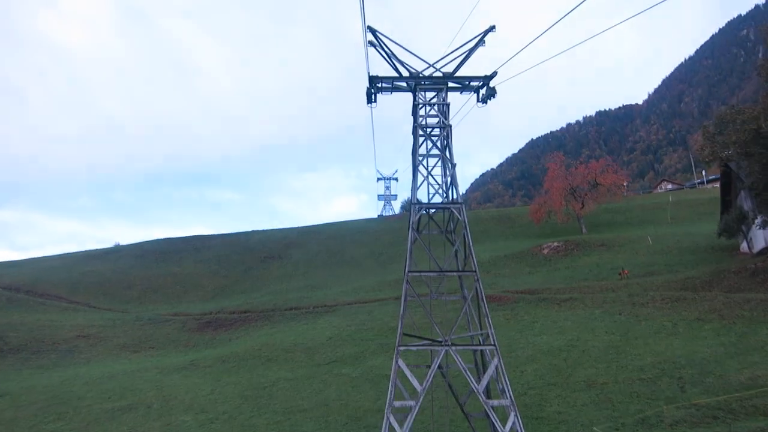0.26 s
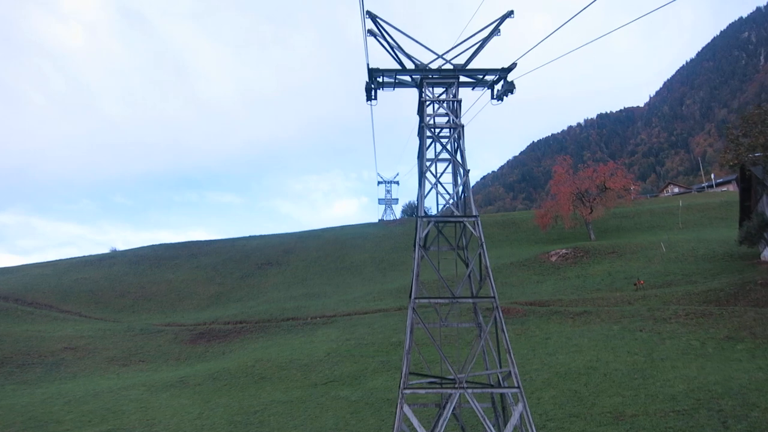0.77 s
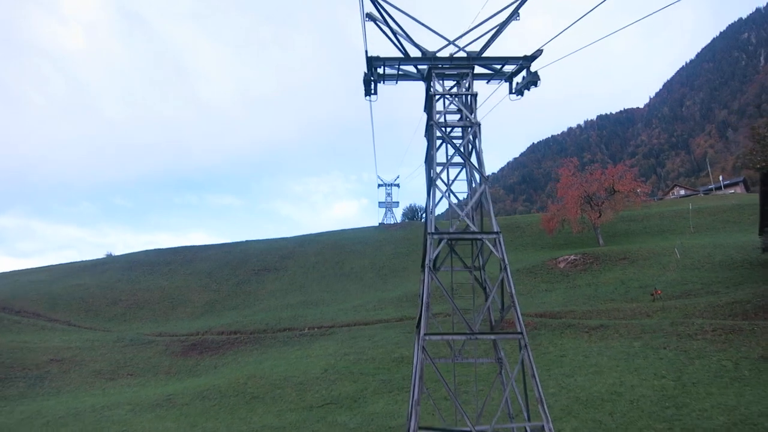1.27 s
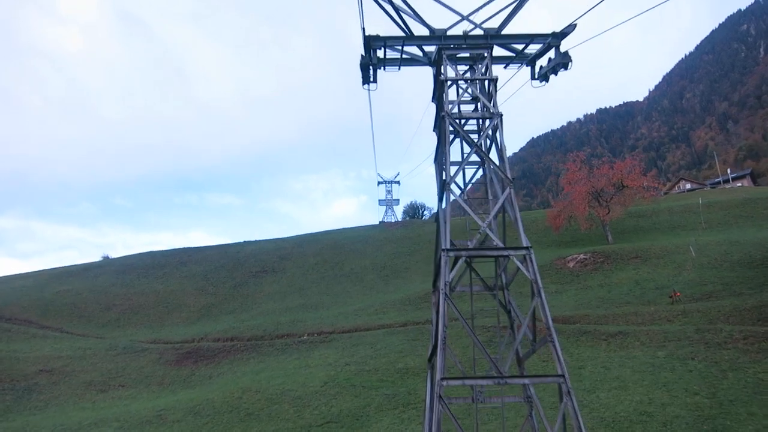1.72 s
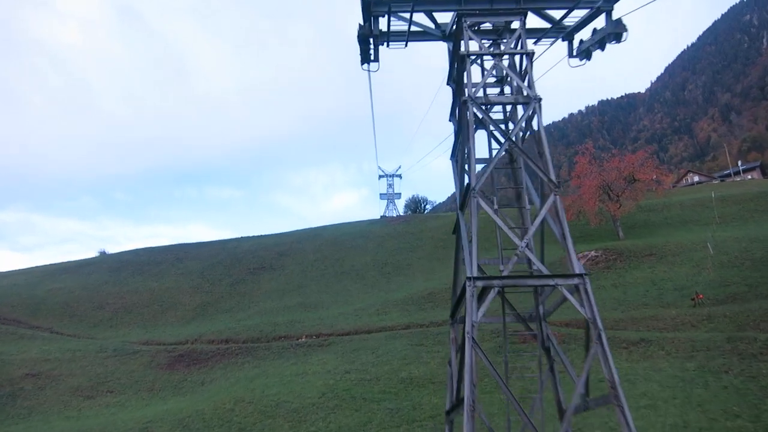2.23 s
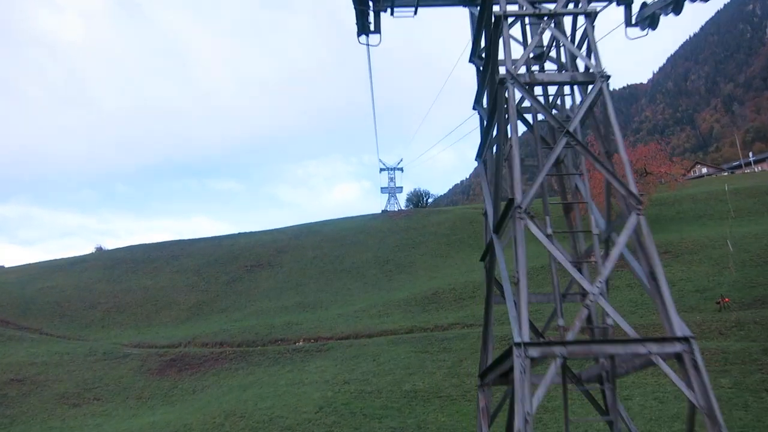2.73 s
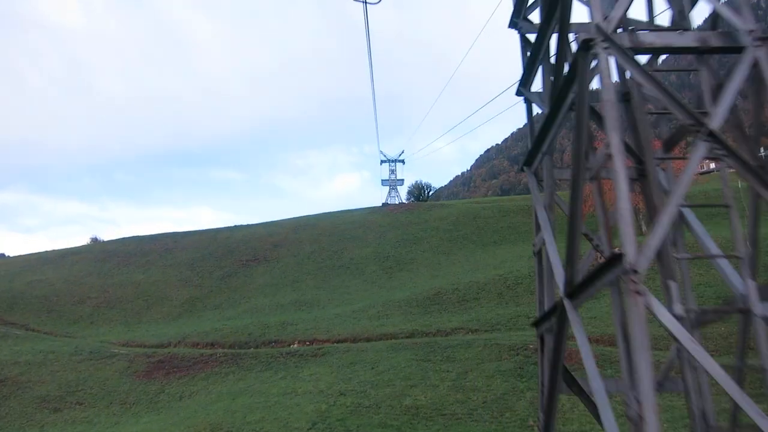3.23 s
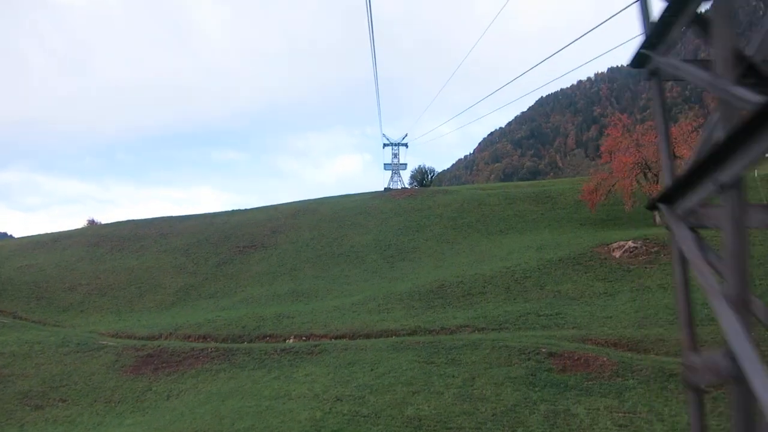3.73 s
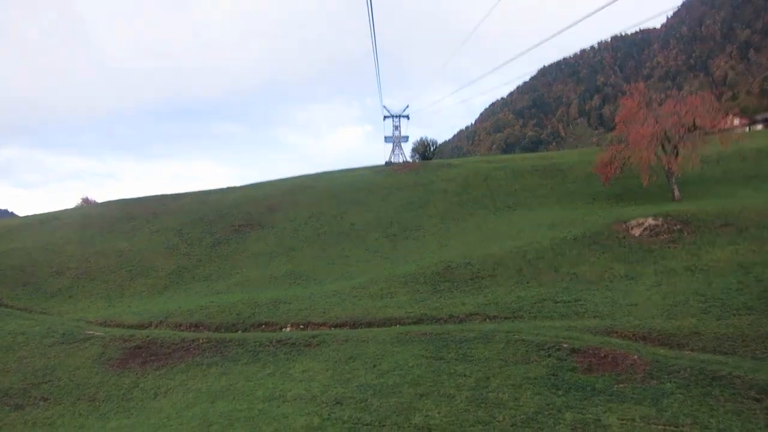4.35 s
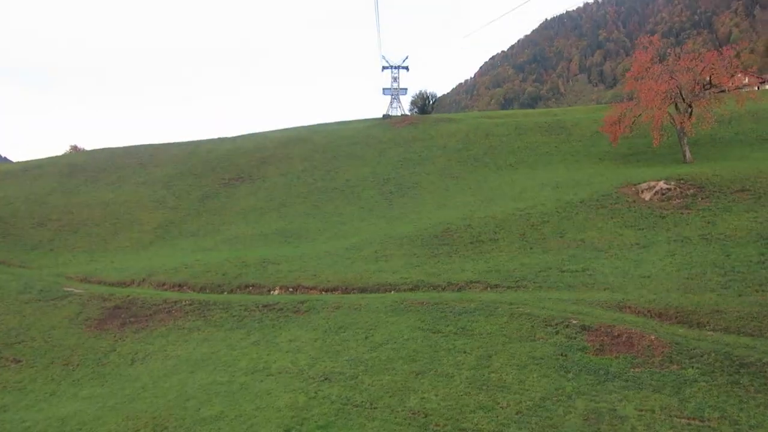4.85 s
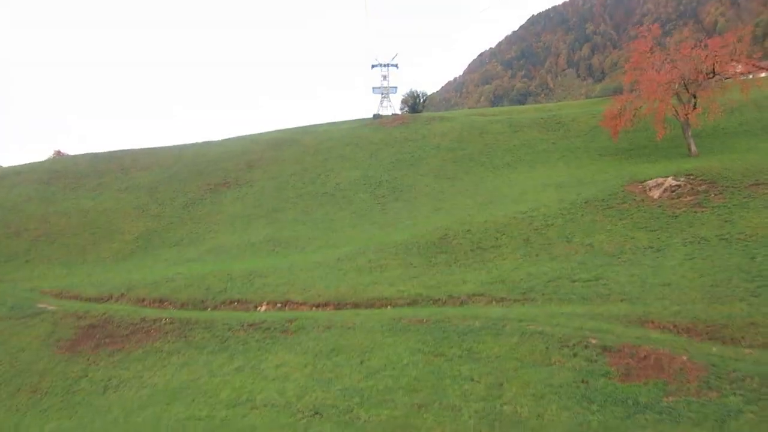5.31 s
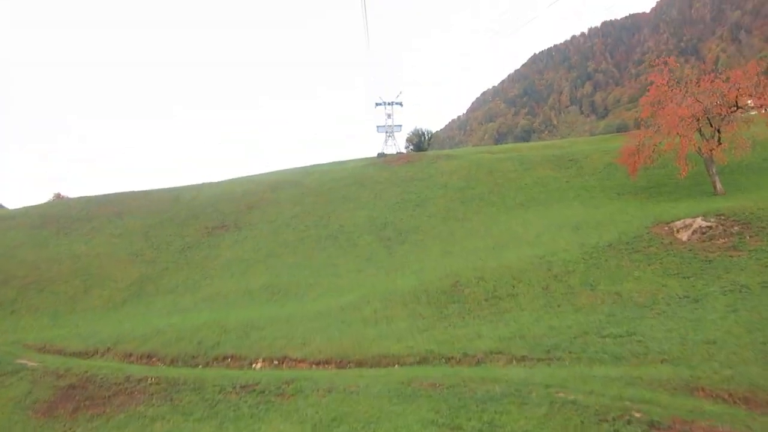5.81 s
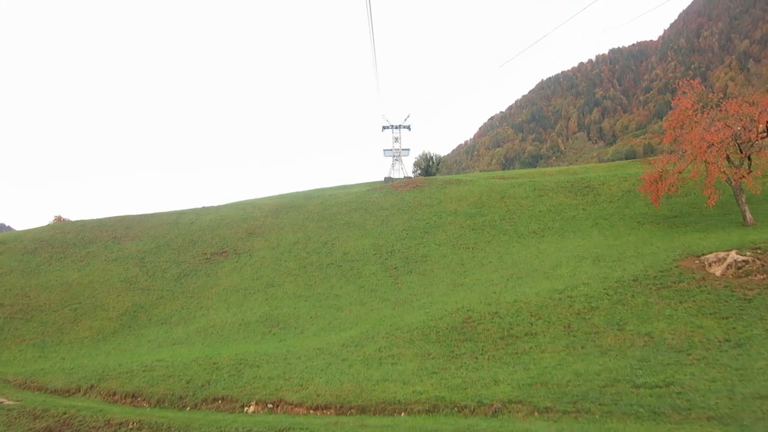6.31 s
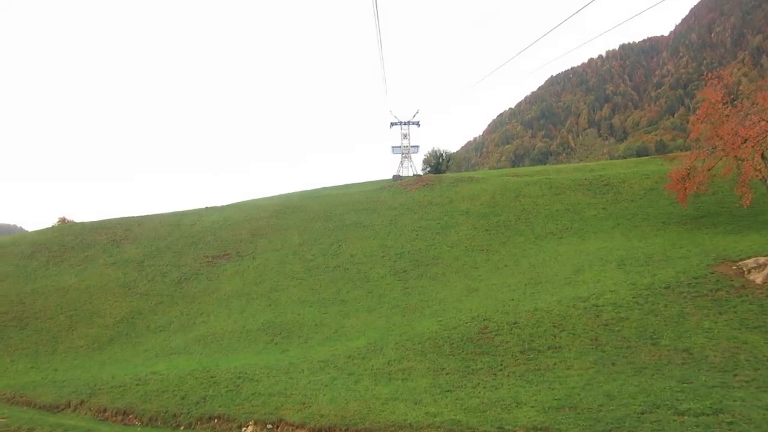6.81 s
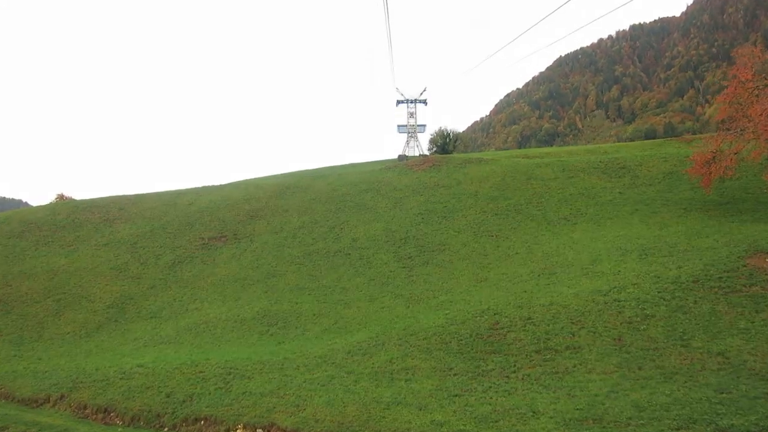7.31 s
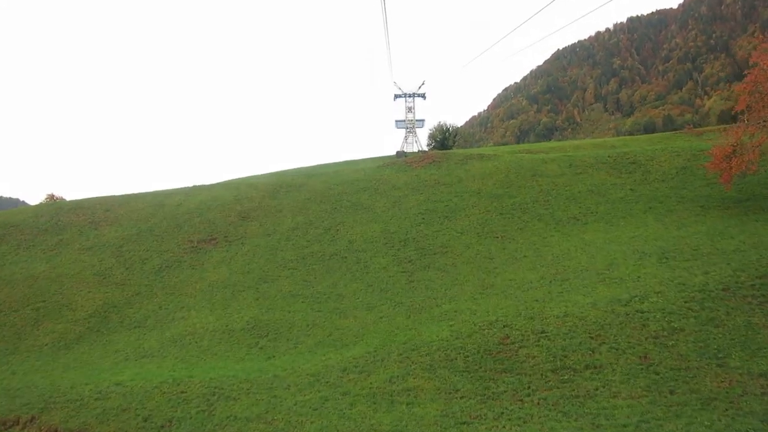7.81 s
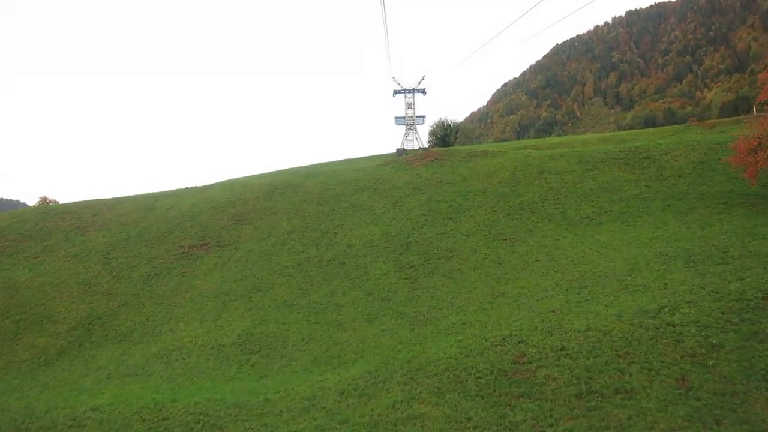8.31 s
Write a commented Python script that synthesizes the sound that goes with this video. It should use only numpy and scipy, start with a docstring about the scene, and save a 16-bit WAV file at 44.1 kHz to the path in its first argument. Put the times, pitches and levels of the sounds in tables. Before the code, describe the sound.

Inside a moving cable car, a pulsing low rumble and buzzing fittings, broken by metallic wheel clunks at a tower and three sharp clicks.

```python
"""Inside an old cable car cabin going uphill, heard from the stereo microphone of a hand-held camera.
Overhead the carriage rolls on the rope in surges that make the cabin boom, roar and rattle.
At a support tower the wheels clunk over the steel saddle, the ride goes quiet for a second,
and the surges build again. Loose fittings buzz all around. Right at the microphone the camera's
housing ticks in the hand, three times sharply."""
import sys
import numpy as np
from scipy import signal
from scipy.fft import rfft, irfft, next_fast_len
from scipy.io import wavfile
from scipy.ndimage import uniform_filter1d, map_coordinates

SR = 44100
rng = np.random.default_rng(int(sys.argv[2]) if len(sys.argv) > 2 else 0)


def int16_out(signal):
    """Quantize to a 16-bit WAV file."""
    q = np.round(np.clip(np.atleast_2d(signal).T, -1, 1) * 32767)
    wavfile.write(sys.argv[1], SR, q.astype(np.int16))


N = 377937


def amp(db):
    """Decibels to gain."""
    return 10 ** (np.asarray(db) / 20)


def unit(x):
    """Scale to rms 1."""
    return x / np.sqrt(np.mean(x ** 2) + 1e-20)


def along(points, hz):
    """(Hz, value) points on a log axis."""
    f, v = np.transpose(points)
    return np.interp(np.log(hz + 1), np.log(f + 1), v)


def curves(rows):
    """One value per sample for each column after the time."""
    s, *cols = np.transpose(rows)
    return [np.interp(np.arange(N) / SR, s, c) for c in cols]


def wobble(rate):
    """A smooth random curve, rate knots a second."""
    return map_coordinates(rng.standard_normal(int(N * rate / SR) + 4), [np.arange(N) * rate / SR])


def filtered(x, response):
    """x times a complex response of frequency."""
    n = x.shape[-1]
    m = next_fast_len(n + SR // 4)
    return irfft(rfft(x, m) * response(np.fft.rfftfreq(m, 1 / SR)), m)[..., :n]


def coloured(x, spectrum):
    """x with a smooth spectrum."""
    return filtered(x, lambda hz: amp(along(spectrum, hz)))


def resonated(x, modes):
    """x through a set of (Hz, width, dB) resonances."""
    return filtered(x, lambda f: sum((-1) ** k * amp(db) * 1j * f * w / (c * c - f * f + 1j * f * w)
                                     for k, (c, w, db) in enumerate(modes)))


def impulse(spectrum_db, size=4096):
    """The sharpest causal pulse that has a given dB response of frequency."""
    cepstrum = irfft(np.log(amp(spectrum_db(np.fft.rfftfreq(size, 1 / SR)))))
    cepstrum[1:size // 2] *= 2
    cepstrum[size // 2 + 1:] = 0
    return irfft(np.exp(rfft(cepstrum)))


def add(track, s, sound):
    """Mix a sound into a track at s seconds."""
    part = track[..., max(round(s * SR), 0):][..., :sound.shape[-1]]
    part += sound[..., :part.shape[-1]]


# Likeness of left and right by frequency, nearly one voice from 3.6 to 6.3 kHz: frequency_hz, correlation
ALIKE = [(60, .99), (125, .985), (250, .96), (450, .8), (700, .82), (2000, .55), (2700, .62), (3600, .94),
         (6300, .94), (8000, .4), (12000, .2)]

def noise(size=N):
    """White noise in two channels, with left and right as alike as the table gives for each frequency."""
    turn = lambda hz: np.arccos(np.clip(along(ALIKE, hz), -1, 1)) / 2
    mid, side = filtered(rng.standard_normal((2, size)),
                         lambda hz: np.array([np.cos(turn(hz)), np.sin(turn(hz))]))
    return np.array([mid + side, mid - side])


# Surges of the carriage overhead, about 2.5 a second: crest_s, half_length_s, roar_db, boom_db
CARRIAGE_SURGES = [(0.142, 0.032, -35.5, -13.5), (0.538, 0.05, -37.0, -13), (0.942, 0.057, -32, -14),
                   (1.322, 0.056, -32, -11.0), (1.725, 0.054, -33.5, -12), (2.114, 0.07, -33.0, -12.0),
                   (2.515, 0.065, -31.5, -11.5), (2.921, 0.062, -30.5, -11), (3.317, 0.076, -33, -12),
                   (3.706, 0.075, -33.5, -15.5), (4.212, 0.085, -26.0, -14), (5.288, 0.068, -42.5, -19.5),
                   (5.736, 0.065, -36.5, -14.5), (6.12, 0.06, -41.5, -13), (6.43, 0.047, -40, -12.5),
                   (6.816, 0.048, -45.5, -18), (7.182, 0.025, -44, -13.5), (7.506, 0.038, -39.5, -12.5),
                   (7.88, 0.061, -38.5, -14), (8.227, 0.073, -35.5, -11.0), (8.578, 0.061, -35.5, -10.5)]

def swell(levels_db, lead_s=0, stretch=1):
    """Power of all surges over time: each is a bell that peaks at its level."""
    t = np.arange(0, N, SR // 200) / SR
    power = sum(amp(db) ** 2 * np.exp(-((t - crest_s + lead_s) / (stretch * half_s)) ** 2)
                for (crest_s, half_s, *_), db in zip(CARRIAGE_SURGES, levels_db))
    return np.interp(np.arange(N) / SR, t, power)


# Steady rolling between surges: time_s, roar_db, boom_db, rumble_db
ROLLING = [(0.0, -42, -15.5, -19), (0.7, -43.5, -20, -23.5), (1.6, -47, -21.5, -23), (2.7, -50.5, -29, -24),
           (3.9, -47, -40, -21.0), (4.5, -45.5, -28, -25.5), (5.0, -53, -24.5, -26), (5.6, -46.5, -21, -27),
           (6.7, -49.0, -21.0, -22.5), (7.7, -46.0, -18, -20), (8.57, -43, -29, -26)]

def ride(boom_lead_s=.026, boom_stretch=1.095, wall_db=-7.5, wall_stretch=1.83):
    """The surges on top of the steady rolling: dB curves of wheel roar, boom and wall rumble."""
    roar_db, boom_db = np.transpose(CARRIAGE_SURGES)[2:]
    surges = [swell(roar_db),
              swell(boom_db, boom_lead_s, boom_stretch),
              swell(boom_db + wall_db, stretch=wall_stretch)]
    return [10 * np.log10(amp(steady) ** 2 + power) for steady, power in zip(curves(ROLLING), surges)]


def boom(boom_db, rumble_db, pitch_hz=46.88, waver_hz=1.59, flutter_db=1.46, octave_db=-21):
    """Each surge shakes the whole cabin at its lowest mode, with a weak octave and some loose rumble."""
    phase = 2 * np.pi * np.cumsum(pitch_hz + waver_hz * wobble(11)) / SR
    mode = unit(np.sin(phase) + amp(octave_db) * np.sin(2 * phase))
    gain = amp(boom_db + flutter_db * wobble(18))
    rumble = unit(coloured(noise(), [(15, -23), (35, -15), (60, 6), (90, -23), (300, -86)]))
    return gain * mode + amp(rumble_db - 13) * rumble


# Resonances of the steel frame: pitch_hz, width_hz, level_db
FRAME_MODES = [(369, 28, 3.5), (507, 52, 1.5), (618, 24, 2.5), (669, 30, 4), (900, 74, 2), (1111, 21, 2),
               (1202, 15, 2.5), (1553, 78, -1), (1694, 32, -2.5), (1860, 61, -7.5), (1969, 18, -5),
               (2032, 78, -8), (2164, 28, -12.5), (2330, 23, -12.5), (2815, 180, -16.5), (3254, 37, -17)]
# The wheels' roar, heard from below: frequency_hz, level_db
ROAR_SPECTRUM = [(150, -40), (350, -4), (500, -10), (570, 2), (660, 1.5), (750, -17), (1050, 1.5),
                 (1400, -3), (2100, -10.5), (2700, -14.5), (3500, -30.5), (6000, -50), (12000, -90)]
# The wheels' hiss: frequency_hz, level_db
HISS_SPECTRUM = [(1500, -26), (3000, 7), (4000, 2.5), (4700, 2), (5400, 0.5), (6000, 3), (8500, 0),
                 (9600, -6.5), (11500, -2), (13000, -9), (15500, -27)]

def wheels(roar_db, frame_db=-1.33, body_db=-3, hiss_db=-18, grit_db=2):
    """Wheels on the stranded rope: a gritty roar in the steel frame, with hiss on top."""
    grit = amp(grit_db * (wobble(130) + wobble(30)))
    frame = resonated(noise() * grit, FRAME_MODES)
    frame = unit(coloured(frame, [(150, -20), (310, 4), (3200, 2), (4500, -20), (12000, -50)]))
    body = unit(echoing(coloured(noise() * grit, ROAR_SPECTRUM)))
    hiss = unit(echoing(coloured(noise() * grit, HISS_SPECTRUM)))
    return amp(roar_db) * (amp(frame_db) * frame + amp(body_db) * body + amp(hiss_db) * hiss)


# Wall panels around the microphone: pitch_hz, width_hz, level_db
PANEL_MODES = [(91.7, 9.7, -0.5), (111.2, 11.8, 1), (127.5, 12, 0), (156.6, 7.7, -9.5), (192.4, 23.8, -6.5),
               (210.9, 16, -7.5), (242.2, 25.3, -4), (275.6, 13, -10.5), (324.2, 12, -18),
               (368.5, 6.6, -25.5)]
# Roof panels under the hanger: pitch_hz, width_hz, level_db
ROOF_MODES = [(197, 21, -4.5), (245.8, 16.6, -1.5), (321.8, 10.3, 3)]
# Broad rumble of the walls: frequency_hz, level_db
RUMBLE_SPECTRUM = [(20, -24), (35, 4), (60, -4.5), (100, -2), (170, -4.5), (270, -9), (350, -20),
                   (500, -18), (580, -25.5), (900, -26.5), (1500, -39.5), (3000, -70.5), (8000, -100)]

def walls(rumble_db, roar_db, panel_db=-1.5, broad_db=-6, roof_db=7, roof_share=0.83):
    """Vibration comes down the hanger and drums in the walls; the roof drones along with the wheels."""
    panels = resonated(noise(), PANEL_MODES)
    panels = unit(coloured(panels, [(50, 6), (85, 4.5), (370, -2.5), (700, -25)]))
    roof = resonated(noise(), ROOF_MODES)
    roof = unit(coloured(roof, [(90, -18), (180, -0.5), (335, -1.5), (400, -15), (600, -30)]))
    drone = amp(roof_db + roar_db.mean() + roof_share * (roar_db - roar_db.mean())) * roof
    broad = unit(coloured(noise(), RUMBLE_SPECTRUM))
    return amp(rumble_db) * (amp(panel_db) * panels + amp(broad_db) * broad) + drone


# Wheels striking the tower's saddle above the roof: start_s, level_db, ring_share
SADDLE_HITS = [(3.72, -19.5, 0.5), (3.816, -22.5, 0.34), (3.878, -21.5, 0.46), (3.905, -27.5, 0.9),
               (3.965, -21.5, 0.7), (4.098, -11.5, 1), (4.158, -28, 0.8), (4.188, -15.5, 0.7),
               (4.206, -28, 0.2), (4.245, -21, 0), (4.403, -24, 0.24), (4.527, -21.5, 0.9),
               (4.602, -19, 0.86), (4.664, -24.5, 0.93), (4.817, -20, 0.96), (5.188, -14, 0.94)]
# Modes of the steel carriage and hanger: pitch_hz, level_db, t60_s
STEEL_MODES = [(416, -3, 0.15), (543, -12.5, 0.13), (676, 2.5, 0.14), (719, 4.5, 0.13), (767, 0.5, 0.12),
               (806, 7.5, 0.074), (831, 8, 0.069), (902, -1, 0.13), (1000, -2.5, 0.083), (1102, -6.5, 0.13),
               (1143, -20, 0.065), (1580, -17.5, 0.21), (1720, -17, 0.091), (1880, -24, 0.21),
               (1930, -21, 0.062)]
# The dull part of a clunk: frequency_hz, level_db
THUD_SPECTRUM = [(100, 4), (300, 4.5), (700, 6), (1100, 2), (1900, -3.5), (2800, -15), (4000, -51),
                 (9000, -41), (15000, -51)]

def saddle(contact_s=0.023, thud_t60_s=0.19, ring_db=-9, thud_db=-8):
    """Each wheel scuffs onto the tower's saddle for a moment and rings the steel carriage."""
    out, t = np.zeros((2, N)), np.arange(SR // 3) / SR
    onset_unit = lambda x: x / np.sqrt(np.mean(x[:, :SR // 25] ** 2))  # rms 1 over the first 40 ms
    for start_s, db, ring_share in SADDLE_HITS:
        ring = np.zeros((2, len(t)))
        for hz, mode_db, t60_s in STEEL_MODES:
            phase = rng.uniform(0, 2 * np.pi) + rng.normal(0, 0.38, (2, 1))
            decay = amp(mode_db + rng.normal(0, 2) - 60 * t / t60_s)
            pitch_hz = hz * (1 + rng.normal(0, .005))
            ring += decay * np.sin(2 * np.pi * pitch_hz * t + phase)
        ring *= 1 - np.exp(-t / contact_s)
        thud = coloured(noise(len(t)), THUD_SPECTRUM)
        thud *= amp(-60 * t / thud_t60_s) * (1 - np.exp(-t / 0.0049))
        add(out, start_s, amp(db + ring_db) * np.sqrt(ring_share) * onset_unit(ring))
        add(out, start_s, amp(db + thud_db) * np.sqrt(1 - ring_share) * onset_unit(thud))
    return out


# Ticks of the housing, right at the microphone: start_s, level_db, treble_db, t60_s
TICKS = [(2.355, -19, -19, 0.1), (3.043, -21, -20, 0.02), (5.132, -23, -21, 0.043),
         (5.145, -21, -20, 0.038), (5.1655, -22, -11, 0.016), (6.4595, -4, -5, 0.014),
         (6.5242, -16, -9, 0.016), (6.5667, -9.5, -7, 0.02), (6.934, -43, -8, .02)]
# The housing's own tone: frequency_hz, level_db
HOUSING_SPECTRUM = [(100, -11), (600, 1.5), (1400, -0.5), (2150, -6.5), (3000, -18.5), (4400, -12),
                    (4900, -19), (5600, -11.5), (6650, -6.5), (7600, -14), (8500, -12), (11000, -14.5),
                    (14200, -17), (15800, -33)]

def clicks(cabin_db=-44, cabin_t60_s=.08):
    """The housing ticks dully when it gives, brightly when it snaps; the cabin answers faintly."""
    out, t = np.zeros((2, N)), np.arange(SR // 10) / SR
    treble_shelf = [(2300, 0.031), (3500, 0.97)]
    for start_s, db, treble_db, t60_s in TICKS:
        body = impulse(lambda hz: along(HOUSING_SPECTRUM, hz) + treble_db * along(treble_shelf, hz))
        scatter = amp(-23 - 60 * t / t60_s) + amp(cabin_db - 60 * t / cabin_t60_s)
        tick = signal.fftconvolve((t == 0) + scatter * noise(len(t)), body[None], axes=1)
        add(out, start_s, amp(db) * tick / np.abs(tick).max())
    return out


# Hard jolts of the fittings: start_s, level_db
HARD_JOLTS = [(0.0567, -31.5), (0.1216, -35), (0.3022, -34), (0.3344, -38), (0.502, -35), (0.5916, -38),
              (0.7756, -37), (0.8633, -34.5), (0.9278, -33), (1.1543, -35.5), (1.2201, -34), (1.514, -33),
              (1.776, -33.5), (2.4967, -35), (2.8444, -34.5), (3.2889, -36), (3.6296, -26), (4, -35.5),
              (4.081, -32), (4.206, -31), (5.2825, -41.5), (5.7109, -38), (6.3756, -42), (6.7844, -40),
              (7.0796, -39.5), (7.1651, -37), (7.3911, -45), (7.4614, -32.5), (7.5073, -36.5),
              (7.6427, -28.5), (7.7917, -39.5), (8.2038, -29.5), (8.4994, -33.5)]

def jolts(roar_db, per_second=6, light_db=-43, ride_share=0.46, spread_db=5):
    """All jolts as (start_s, level_db): the hard ones, and random light ones that grow with the roar."""
    count = int(per_second * N / SR)
    offset, strength = rng.random((count, 2)).T
    at = ((np.arange(count) + offset) * N / count).astype(int)
    db = light_db + ride_share * (roar_db[at] - roar_db.mean()) + spread_db * (2 * strength - 1)
    return [*HARD_JOLTS, *zip(at / SR, db)]


# Loose window fittings near the microphone: pitch_hz, width_hz, level_db
FITTING_MODES = [(1500, 186, 9), (2760, 120, 8), (3240, 110, 0.5), (3630, 190, -1.5), (4660, 240, 2.5),
                 (5200, 180, 1.5), (5940, 490, -3), (6660, 300, -2), (7230, 320, 0.5), (8450, 650, -1.5),
                 (11000, 2200, -7)]

def rattles(roar_db, shake_db=-8, shake_t60_s=0.16, knock_db=-6, thump_db=13.5, thump_t60_s=0.31):
    """Each jolt thumps the wall panels, knocks the frame and leaves the loose fittings buzzing."""
    t = np.arange(SR // 4) / SR
    shake, thump = np.zeros((2, N))
    for start_s, db in jolts(roar_db):
        add(shake, start_s, amp(db + shake_db - 60 * t / shake_t60_s) * (1 - np.exp(-t / 0.00034)))
        add(thump, start_s, amp(db + thump_db - 60 * t / thump_t60_s) * (1 - np.exp(-t / 0.008)))
    buzz = echoing(resonated(noise() * amp(5.2 * wobble(400)), FITTING_MODES))
    buzz = unit(coloured(buzz, [(600, -3), (1500, 3), (11500, -2), (15500, -12)]))
    panels = unit(coloured(resonated(noise(), PANEL_MODES), [(300, 0), (700, -26), (3000, -60)]))
    knock = amp(knock_db) * unit(resonated(noise(), FRAME_MODES))
    return shake * (buzz + knock) + thump * panels


# One loose fitting's ping: pitch_hz, width_hz, level_db
PING_MODES = [(2740, 190, -2.5), (4680, 160, -6.5), (8400, 350, -8.5)]

def chatter(roar_db, per_second=50, level_db=-44, spread_db=11):
    """Loose fittings tap at random, each tap a tiny metallic ping, harder when the ride is rough."""
    out, t = np.zeros(N), np.arange(SR // 40) / SR
    rough_db = roar_db - roar_db.mean()
    for when, softness, pitch in rng.random((int(per_second * N / SR), 3)):
        detune = 1 + .05 * (pitch - .5)
        ping = sum(amp(db) * np.sin(2 * np.pi * hz * detune * t) * np.exp(-np.pi * width_hz * t)
                   for hz, width_hz, db in PING_MODES)
        add(out, when * N / SR, amp(level_db + rough_db[int(when * N)] - spread_db * softness) * ping)
    return out


# Bright metal tinks in the cabin: start_s, level_db
METAL_TINKS = [(3.4824, -33), (3.631, -39), (5.185, -48), (5.203, -44), (5.222, -48), (7.507, -42)]

def tinks(strike_t60_s=0.0091, ring_db=-16, ring_t60_s=0.09):
    """A tiny piece of metal tinks very high and rings briefly."""
    out, t = np.zeros((2, N)), np.arange(SR // 8) / SR
    modes = [(7140, 430, -13), (11100, 600, -3), (12500, 780, -5)]
    decay = amp(-60 * t / strike_t60_s) + amp(ring_db - 60 * t / ring_t60_s)
    for start_s, db in METAL_TINKS:
        add(out, start_s, amp(db) * decay * unit(resonated(noise(len(t)), modes)))
    return out


# Faint metal squeaks: start_s, length_s, top_pitch_hz, level_db
METAL_SQUEAKS = [(4.3, .09, 13100, -64), (4.443, .065, 12450, -60), (7.2, 0.0596, 9180, -64)]

def squeaks(arch=.05, rasp=.1):
    """Thin, raspy whistles of rubbing metal arch up and down in pitch."""
    out = np.zeros(N)
    for start_s, length_s, top_hz, db in METAL_SQUEAKS:
        u = np.linspace(-1, 1, int(length_s * SR))
        pitch_hz = top_hz * (1 - arch * u ** 2 + rasp * rng.standard_normal(len(u)))
        add(out, start_s, amp(db) * (1 - u ** 2) * np.sin(2 * np.pi * np.cumsum(pitch_hz) / SR))
    return out


def sizzle(roar_db, level_db=-68, ride_share=.3, flicker_db=4):
    """The fittings never quite settle: a thin, flickering ring under their taps."""
    modes = [(2790, 90, -5), (4600, 130, 0), (6850, 240, -6)]
    ring = unit(resonated(noise() * amp(flicker_db * wobble(70)), modes))
    return amp(level_db + ride_share * (roar_db - roar_db.mean())) * ring


# Faint background hiss: frequency_hz, level_db
FLOOR_HISS_SPECTRUM = [(1000, 4), (3000, -22), (4100, 2), (4550, -1), (5400, -5.5), (6900, 4.5), (7800, 2),
                       (8500, 2.5), (9500, -8), (11000, -4.5), (12800, -8), (15500, -14)]

def floor_hiss(rumble_db, level_db=-60, ride_share=0.74):
    """A thin, nearly steady hiss that sinks when the ride is smooth."""
    slow_db = uniform_filter1d(rumble_db, SR // 3)
    gain = amp(level_db + ride_share * (slow_db - slow_db.mean()) + 0.32 * wobble(20))
    return gain * unit(echoing(coloured(noise(), FLOOR_HISS_SPECTRUM), wet_db=-8))


def echoing(x, t60=0.19, wet_db=-1):
    """The glass and metal of the small cabin comb a sound into many fine resonances."""
    t = np.arange(SR // 6) / SR
    tail = rng.standard_normal(len(t)) * amp(-60 * t / t60)
    response = (t == 0) + amp(wet_db) * tail / np.linalg.norm(tail)
    return signal.fftconvolve(x, response[None], axes=1)[:, :N]


# Stereo balance at the microphone: frequency_hz, left_minus_right_db
STEREO_BALANCE = [(50, 2.5), (91, 1.6), (140, .6), (210, -1.3), (320, -1), (490, 1.5), (1000, 1),
                  (2000, 2.4), (4000, .6), (8000, -.2), (12000, 2.7)]

def scene():
    """Everything in the cabin, leaning a little to one side or the other by frequency."""
    roar_db, boom_db, rumble_db = ride()
    cabin = boom(boom_db, rumble_db) + walls(rumble_db, roar_db) + wheels(roar_db) + floor_hiss(rumble_db)
    cabin += saddle() + clicks() + tinks() + squeaks()
    cabin += rattles(roar_db) + chatter(roar_db) + sizzle(roar_db)
    return filtered(cabin, lambda hz: amp(np.outer([.5, -.5], along(STEREO_BALANCE, hz))))


TOP_HZ = 15800

def record(dry):
    """The camera keeps nothing above its band limit."""
    return filtered(dry, lambda hz: hz < TOP_HZ)


dry = scene()
out = record(dry)
int16_out(out)
```